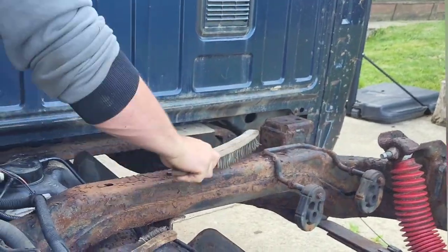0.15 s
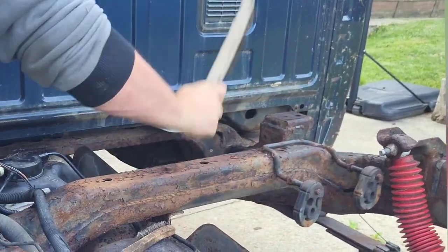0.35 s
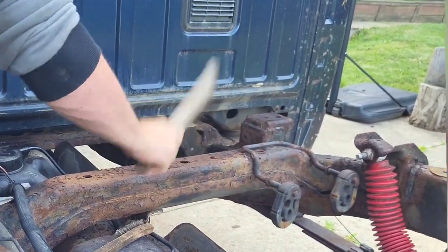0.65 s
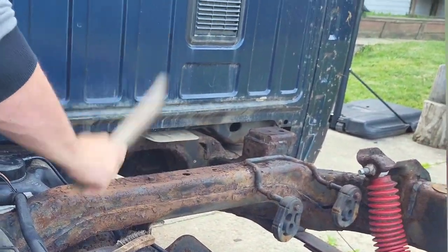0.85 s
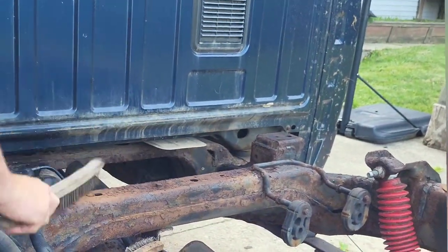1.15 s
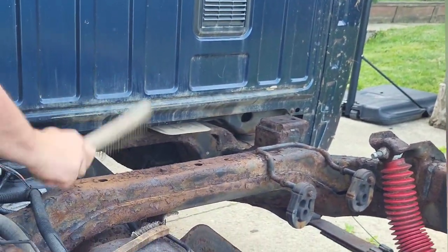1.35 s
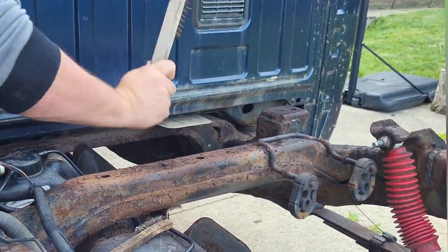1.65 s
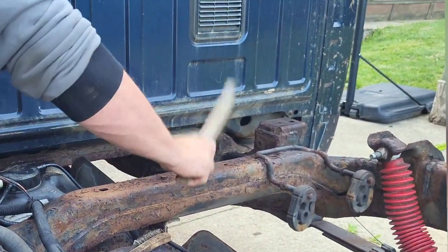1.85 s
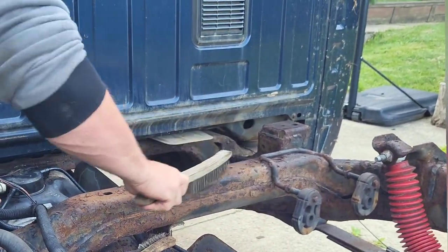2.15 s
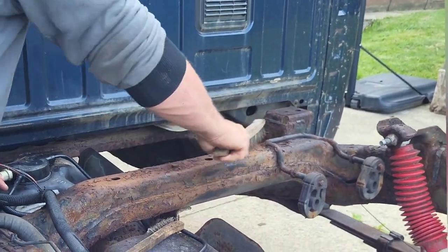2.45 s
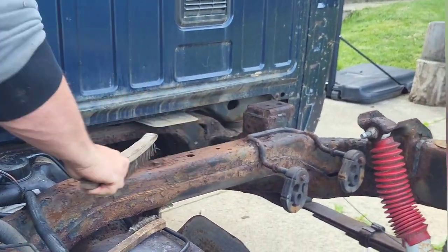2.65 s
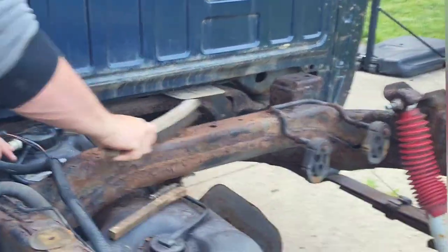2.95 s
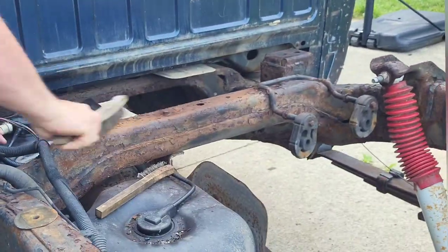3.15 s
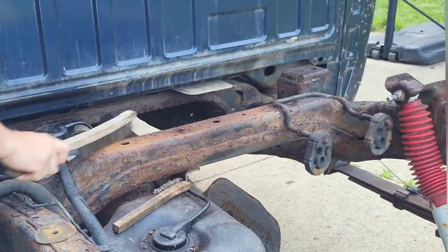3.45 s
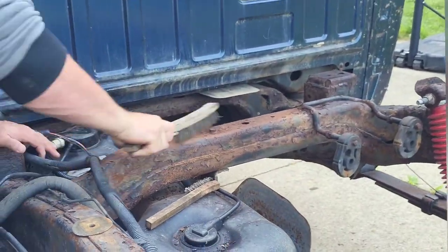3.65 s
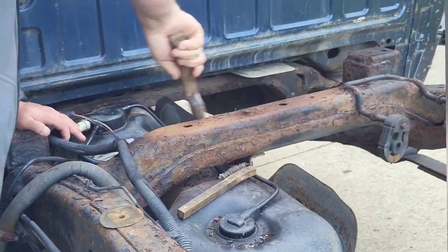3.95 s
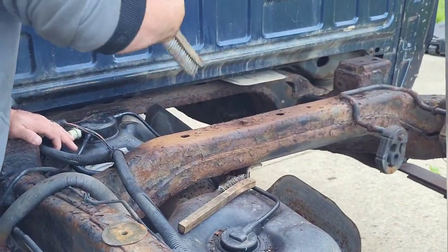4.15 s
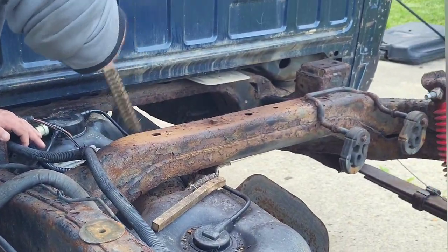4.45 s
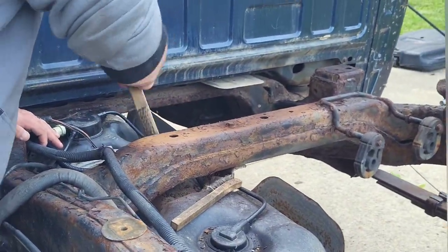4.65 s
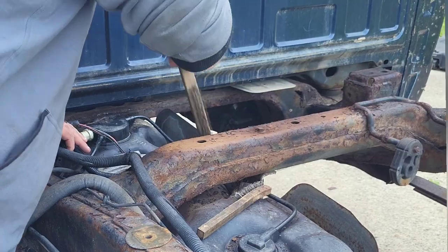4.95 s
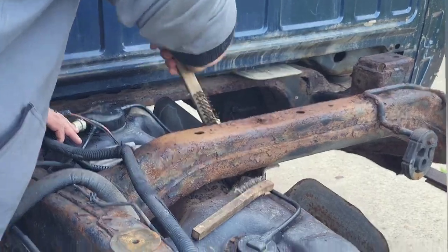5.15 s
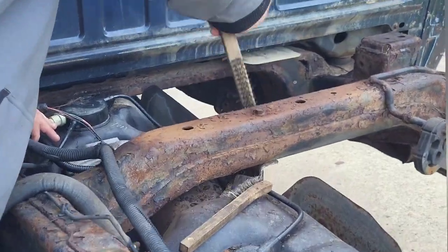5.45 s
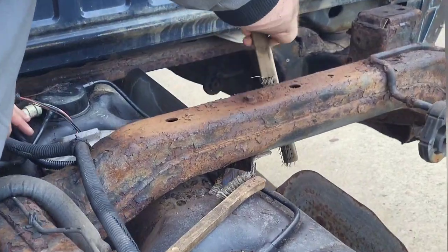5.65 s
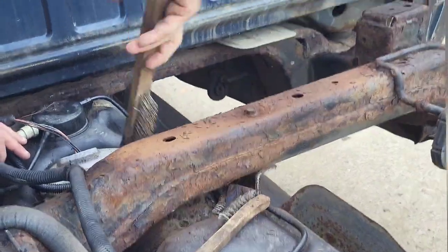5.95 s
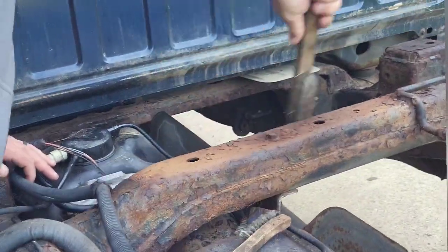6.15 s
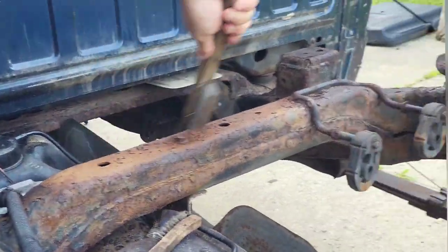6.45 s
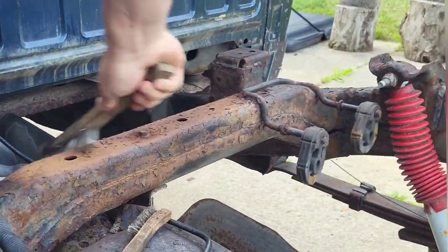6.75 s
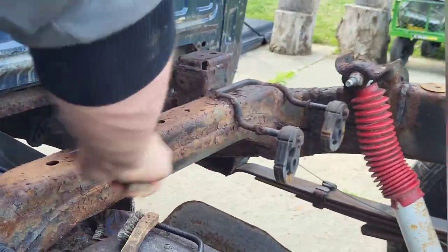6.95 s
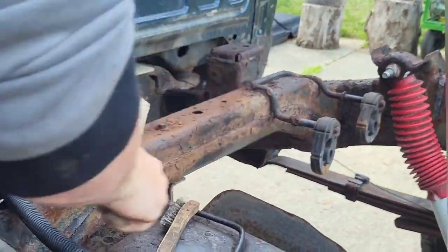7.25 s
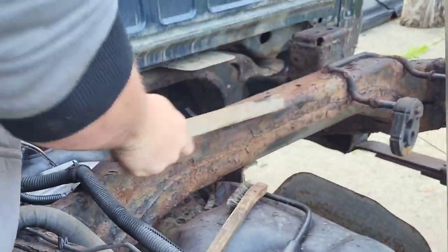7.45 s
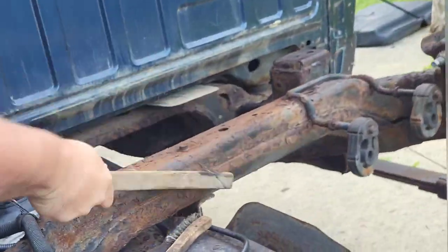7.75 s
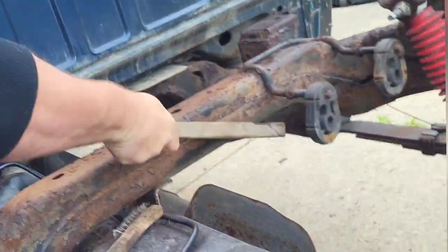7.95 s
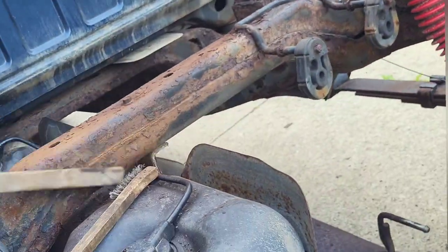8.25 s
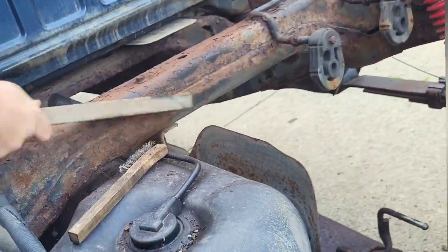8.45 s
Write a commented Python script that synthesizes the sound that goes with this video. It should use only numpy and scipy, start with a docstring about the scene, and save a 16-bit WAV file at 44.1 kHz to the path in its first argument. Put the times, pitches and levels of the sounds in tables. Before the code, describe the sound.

Close outdoors, a wire brush makes a few quick, bright scrubs on a heavy steel frame, then its wooden back bangs the metal rapidly for over a second and a half. Softer scrubbing resumes and grows steady, thins out, pauses briefly with light knocks, then scrapes unevenly before returning loud and brisk to the end. Low wind lumps bump the stereo microphones.

```python
"""A hand wire brush scrubs a rusty steel frame outdoors in quick back-and-forth strokes.
Dense bristle clicks swell with each stroke, and faint drags trail some; they fizz and ring the steel.
The wooden back of the brush bangs on the frame in a fast series and bumps it again later, among faint
rustles and small ticks: noise bursts ring the same steel, heavy bumps add low thuds, all but thuds echo.
Low, lumpy noise is wind on the microphones, mostly the left one; a faint hiss is the far hush."""
import sys
import numpy as np
from scipy import signal
from scipy.fft import rfft, irfft, next_fast_len
from scipy.io import wavfile
from scipy.ndimage import uniform_filter1d

SR = 44100
rng = np.random.default_rng(int(sys.argv[2]) if len(sys.argv) > 2 else 0)


def store_wav(level_fs):
    """Save 16-bit WAV to argv[1]."""
    pcm = np.round(np.clip(np.atleast_2d(level_fs), -1, 1) * 32767)
    wavfile.write(sys.argv[1], SR, pcm.T.astype(np.int16))


N = 379701


def gain_of(db):
    """Turns decibels into a factor for the sound pressure."""
    return 10 ** (np.asarray(db) / 20)


def evened(x):
    """Scales to a mean power of one."""
    return x / np.sqrt(np.mean(abs(x) ** 2) + 1e-20)


def read(points, hz):
    """Reads a curve between its points on a log-frequency axis."""
    f, value = np.transpose(points)
    return np.interp(np.log(hz + 1), np.log(f + 1), value)


def hump(hz, centre_hz, octaves):
    """A bell on a log-frequency axis."""
    return np.exp(-.5 * (np.log2((hz + 1) / centre_hz) / octaves) ** 2)


def coloured(x, response):
    """Filters by a function of frequency, scaled to keep the power of white noise."""
    size = next_fast_len(x.shape[-1] + 8192)
    shape = evened(response(np.fft.rfftfreq(size, 1 / SR)))
    return irfft(rfft(x, size) * shape, size)[..., :x.shape[-1]]


def flutter(seconds, size=N):
    """Unit noise smoothed twice over a span, for slow random changes."""
    span = max(round(seconds * SR), 1)
    once = uniform_filter1d(rng.standard_normal(size), span)
    return evened(uniform_filter1d(once, span))


# How alike the two microphones hear: f/Hz, likeness (1 = the same, 0 = unrelated)
LIKENESS = [(60, 1), (180, 1), (380, 1), (600, 0.66), (1650, 0.18), (4970, 0.0089), (15000, 0.0)]


def paired(x):
    """Two microphones share the bass and differ in the treble."""
    size = next_fast_len(N)
    same = np.clip(read(LIKENESS, np.fft.rfftfreq(size, 1 / SR)), 0, 1)
    left, other = rfft(x, size)
    right = same * left + np.sqrt(1 - same ** 2) * other
    return irfft(np.array([left, right]), size)[:, :N]


DIRECT_DB = -5  # sound that skips the modes, on the scale of the mode levels

# Ringing modes of the steel frame: f/Hz, width/Hz, relative level/dB
FRAME_MODES = [(169, 53, 1.5), (246, 21, 7.5), (300.6, 61, 9), (367.7, 7.6, -0.5), (500, 18.4, -1.5),
               (606, 36, -7), (697, 22, -3.5), (800, 235, 1), (1140, 47, 6.5), (1240, 52, 7.5),
               (1400, 64, -3), (1575, 40, 5.5), (2055, 490, -1), (2302, 48, -0.5), (2540, 34, -2.5),
               (2838, 52, -5), (2796, 120, -14), (3060, 43, -9), (3248, 54, -7), (3470, 75, -10.5),
               (3800, 32, -4.5), (4130, 760, -15.5), (4780, 71, -8)]


def steel(hz, place_db):
    """The frame's modes as resonances over a flat path; the place of contact favours some modes."""
    response = gain_of(DIRECT_DB)
    for (f, width, db), extra_db in zip(FRAME_MODES, place_db):
        response = response + gain_of(db + extra_db) / (1 + 2j * (hz - f) / width)
    return response


PLACE_DB = 3  # spread of mode levels from place to place; blows use half of it


def along_frame(body, stroke, count=5):
    """Each stroke or drag lands on one of a few places, and each place favours other modes."""
    place = rng.integers(0, count, stroke.max() + 1)[stroke]
    out = np.zeros_like(body)
    for k in range(count):
        place_db = PLACE_DB * rng.standard_normal(len(FRAME_MODES))
        here = uniform_filter1d((place == k) * 1., 300)  # smooth change from place to place
        out += coloured(body * here, lambda f: steel(f, place_db))
    return out


LIFT_DB, LAND_DB = -110, -49  # relative fizz at lifting and landing
PEAKED, EARLY = 0.92, .89  # shape and lean of each swell
HALT_DB, HALT_S = -8, 0.01  # depth and half length of a dead stop
GRAIN_DB, PATCH_DB = 1.5, 2.0  # spread of click sizes and of patches of colour
TUFT_DB = 1.3  # spread of each of two flutters, as tufts catch
STEADY, USUAL_DB = 0.19, -32  # steel loses 0.19 dB against the fizz per dB of fizz over usual
PULL_OCTAVES_PER_DB = -.05  # rows that ring the steel more also ring it lower
WANDER_OCTAVES, REGION_OCTAVES = .1, .22  # stray from row to row, and width, of the loudest region

# Strokes and the faint drags that trail some swipes: t/s at the start,
# relative fizz level/dB at its crest
STROKE_TIMES = [(0.0, -23), (0.066, -24), (0.121, -22.5), (0.187, -26.5), (0.248, -27), (0.325, -58),
                (1.998, -37), (2.18, -35), (2.234, -41), (2.301, -32.5), (2.357, -36), (2.417, -30.5),
                (2.481, -34), (2.535, -28.5), (2.6, -30.5), (2.671, -34), (2.718, -34), (2.788, -29.5),
                (2.851, -29.5), (2.907, -28), (2.973, -32.5), (3.026, -28), (3.088, -29), (3.162, -28),
                (3.205, -30.5), (3.28, -35), (3.345, -30), (3.464, -27.5), (3.505, -29.5), (3.628, -29.5),
                (3.695, -28), (3.747, -27.5), (3.816, -28), (3.889, -35), (3.964, -41), (4.02, -50.5),
                (4.085, -66), (4.329, -47.5), (4.386, -33.5), (4.44, -37), (4.48, -27.5), (4.536, -39.5),
                (4.567, -39), (4.603, -42), (4.646, -35), (4.7, -41.5), (4.852, -41), (4.885, -37.5),
                (4.932, -43.5), (4.964, -37), (5.011, -35), (5.085, -37.5), (5.128, -33.5), (5.187, -36),
                (5.252, -40.5), (5.292, -30.5), (5.346, -44.5), (5.39, -32), (5.445, -45.5), (5.48, -30.5),
                (5.538, -50), (5.564, -33), (5.62, -46.5), (5.705, -38.5), (5.784, -39.5), (5.861, -56),
                (5.93, -62.5), (6.089, -23.5), (6.168, -26), (6.226, -25), (6.277, -24.5), (6.333, -23),
                (6.389, -26), (6.438, -26.5), (6.493, -29), (6.549, -27.5), (6.605, -27.5), (6.657, -29.5),
                (6.712, -29.5), (6.766, -27.5), (6.825, -28), (6.89, -27), (6.955, -30.5), (7.011, -25),
                (7.068, -30.5), (7.136, -28.5), (7.21, -30.5), (7.276, -29.5), (7.361, -34), (7.452, -30),
                (7.619, -23), (7.718, -23.5), (7.779, -23.5), (7.853, -26), (7.918, -26.5), (7.983, -22.5),
                (8.109, -25.5), (8.175, -21), (8.23, -22), (8.29, -19.5), (8.356, -27), (8.404, -24.5),
                (8.463, -25), (8.521, -24.5), (8.576, -24)]
# The brush leaves the steel until the next stroke: t/s
LIFT_TIMES = [0.372, 4.16, 7.576, 8.64]
# Turns where the hand stops dead and the fizz drops briefly: t/s
HALT_TIMES = [0.121, 2.18, 2.301, 2.417, 2.788, 3.161, 3.28, 3.345, 3.504, 3.628, 4.387, 4.44, 4.7, 5.128,
              5.292, 5.644, 6.226, 6.388, 6.549, 6.712, 6.825, 7.136, 7.361, 7.452, 7.779, 8.109, 8.176,
              8.29, 8.521]
# How the brush is held: t/s, bristle ring relative level/dB, low scrape relative level/dB,
# left over right level/dB, dip between swells level/dB, steel over fizz relative level/dB,
# extra steel on every other row and less on the rest level/dB,
# steel's loudest region f/Hz before it shifts
GRIP_CHANGES = [(0, 1, -4.5, 1, 8.5, 1.5, 0, 3570), (2, 8, 0, 2, 4.5, 4, -1.5, 3260),
                (2.998, 3.5, 0, 1.5, 8, 3, -1.4, 3510), (4, 1, -1.5, 3.5, 6.5, 1, -0.3, 3250),
                (4.3, 0, 17, 3, 10.5, -7.5, -0.8, 2480), (5.2, -4, 10.5, 1.5, 13, -0.5, 0.8, 3130),
                (5.9, 0.5, 10, 0.5, 11, -5.5, -0.5, 3380), (6.2, -2, 2.5, 1.5, 11.5, -2, 6, 3500),
                (6.6, -0.5, 8, 1.5, 4.5, -7, 4, 3130), (6.8, 12.5, 4.5, -1, 11, -0.8, 4, 3070),
                (7.2, 9.5, 4.5, -4.5, 8, 0.8, 6, 2860), (7.6, 5, 2, 3, 6.5, -3.5, 1.2, 2920),
                (8, -1, -0.5, 3, 6.5, -2, -0.1, 3330), (8.61, -2.5, 9.5, 1.5, 7, -8, 0.8, 2870)]
# Colour of bristle tips flicking over rust: f/Hz, relative level/dB (per Hz)
FIZZ_COLOUR = [(2060, -28.5), (3500, -29), (4220, -3.5), (5650, -7.5), (7390, -1), (9240, -10),
               (11000, -11.5), (13300, -3.5), (15500, -4.5)]


def brush():
    """Dense bristle clicks swell in each stroke or drag and ring the steel under them."""
    events = list(STROKE_TIMES) + [(s, -np.inf) for s in LIFT_TIMES]
    start, crest_db = np.transpose(sorted(events))
    s, ring_db, scrape_db, pan_db, dip_db, steel_db, pull_db, region_hz = np.transpose(GRIP_CHANGES)
    off = np.isinf(crest_db)

    # loudness where one swell meets the next
    edge_db = (crest_db + np.roll(crest_db, 1)) / 2 - np.interp(start, s, dip_db)
    edge_db[np.roll(off, 1)], edge_db[off] = LAND_DB, LIFT_DB
    edge_db[0] = crest_db[0] - dip_db[0]
    crest_db[off] = USUAL_DB  # only a stand-in, muted below

    # rise and fall of each swell
    t = np.arange(N) / SR
    k = np.clip(np.searchsorted(start, t, "right") - 1, 0, len(start) - 2)
    progress = np.clip((t - start[k]) / (start[k + 1] - start[k]), 0, 1) ** EARLY
    rest_db = edge_db[k] + progress * (edge_db[k + 1] - edge_db[k])
    swell = abs(np.sin(np.pi * progress)) ** PEAKED
    level_db = rest_db + swell * (crest_db[k] - rest_db)
    level_db += HALT_DB * sum(np.exp(-((t - halt) / HALT_S) ** 2) for halt in HALT_TIMES)

    # some tips snap harder, and rust flakes catch whole tufts
    clicks = rng.standard_normal((2, N)) * gain_of(GRAIN_DB * rng.exponential(1, N))
    clumps_db = TUFT_DB * (flutter(0.011) + flutter(0.0085))
    rubbing = evened(clicks) * gain_of(level_db + clumps_db) * ~off[k]
    hz, frames, z = signal.stft(rubbing, SR, nperseg=256, noverlap=192)
    hz = hz[:, None]

    # every other row rings the steel differently
    middle = start + np.append(np.diff(start), 0) / 2
    pull_db = np.interp(middle, s, pull_db) * (-1) ** np.arange(len(start))
    steel_db = np.interp(middle, s, steel_db) + pull_db - STEADY * (crest_db - USUAL_DB)
    shift = PULL_OCTAVES_PER_DB * pull_db + WANDER_OCTAVES * rng.standard_normal(len(start))
    region_hz = np.interp(middle, s, region_hz) * 2 ** shift
    ring_db, scrape_db, pan_db = (np.interp(frames, s, c) for c in (ring_db, scrape_db, pan_db))

    # random patches of colour across pitch and time
    patch_noise = uniform_filter1d(rng.standard_normal(z.shape[1:]), 2, 0)
    patches = gain_of(PATCH_DB * evened(uniform_filter1d(patch_noise, 14, 1)))

    fizz_gain = gain_of(read(FIZZ_COLOUR, hz) + 3.5 + ring_db * hump(hz, 7600, 0.2))
    region = hump(hz, np.interp(frames, middle, region_hz), REGION_OCTAVES)
    scrape = gain_of(scrape_db - 18.0) * hump(hz, 1330, 2.7)
    body_gain = region + .5 * hump(hz, 3100, 0.69) + scrape
    side = gain_of(np.array([pan_db, -pan_db]) / 2)[:, None]
    body_gain = body_gain * gain_of(np.interp(frames, middle, steel_db) + 5.0) * side
    fizz, body = (signal.istft(z * patches * g, SR, nperseg=256, noverlap=192)[1][:, :N]
                  for g in (fizz_gain, body_gain))
    return paired(fizz + along_frame(body, k))


CALM_DB = -47  # relative level of the breeze between gusts
SHARED_WIND = .5  # likeness of the buffeting at the two microphones
GUST_DB = 2.0  # lumpiness

# Gusts over the breeze: t/s at the top, relative level/dB, half length/s
GUST_TIMES = [(0.1, -47.5, 1), (0.798, -67, 0.27), (2.142, -35, 0.076), (2.333, -31, 0.025),
              (2.74, -40.5, 0.1), (3.573, -33, 0.093), (3.8, -36, 0.077), (4.42, -51, 0.2),
              (5.27, -47, 0.088), (6.248, -43, 0.047), (8.35, -35, 0.033)]
# Colour of the buffeting: f/Hz, relative level/dB (per Hz)
BUFFET_COLOUR = [(8.8, -39.5), (15, -20), (41, -4), (60, 4.5), (126, -5.5), (295, -27), (336, -22),
                 (500, -53), (650, -66), (1100, -120)]


def wind():
    """Lumpy low pressure at the microphones, partly shared, stronger on the left."""
    t = np.arange(N) / SR
    left, other = coloured(rng.standard_normal((2, N)), lambda f: gain_of(read(BUFFET_COLOUR, f)))
    right = SHARED_WIND * left + np.sqrt(1 - SHARED_WIND ** 2) * other
    level = gain_of(CALM_DB)
    for s, db, half in GUST_TIMES:
        level = level + gain_of(db) * np.exp(-((t - s) / half) ** 2)
    lumps = level * gain_of(GUST_DB * flutter(0.01))
    return np.array([left, right]) * gain_of([[2.8], [-2.8]]) * lumps


# Colour of the distant outdoor hush: f/Hz, relative level/dB (per Hz)
HUSH_COLOUR = [(88, -48), (150, -5), (396, -16.5), (1020, -12.5), (1200, -17.5), (2360, -14.5),
               (10000, -30.5), (14000, -39), (15500, -30)]


def air():
    """A steady far hush, made of filtered noise."""
    hush = coloured(rng.standard_normal((2, N)), lambda f: gain_of(read(HUSH_COLOUR, f)))
    return gain_of(-54.5) * paired(hush)


def surroundings(x):
    """Sparse echoes off the truck cab and the concrete, short and dull as treble dies sooner."""
    taps = np.zeros((2, 13000))
    at = np.arange(200, 12980, 20) + rng.integers(0, 20, (2, 639))
    np.put_along_axis(taps, at, rng.choice([-1., 1.], at.shape), 1)
    hz, t, z = signal.stft(taps, SR, nperseg=256)
    t60 = read([(300, 0.16), (2000, 0.089), (12000, 0.049)], hz)[:, None]  # f/Hz, time to fall 60 dB/s
    tail = signal.istft(z * gain_of(-60 * t / t60), SR, nperseg=256)[1]
    return signal.fftconvolve(x, tail / np.linalg.norm(tail[0]), axes=1)[:, :N]


def contact(t, rise, hold, t60):
    """Force of a contact: it builds to a spike, holds while the parts touch, then dies by 60 dB in t60."""
    spike = 1 + 0.00024 / (rise + 0.009) * np.exp(-abs(t - rise) / 0.0003)  # sharper for a quick rise
    build = np.clip(t / rise, 0, 1) ** 0.85
    return spike * build * gain_of(-60 * np.maximum(t - rise - hold, 0) / t60)


BOOM_HZ, RING_OCTAVES = 378, .15  # centre of the boom; width of the ring's loudest region
ACCENT_DB, ACCENT_OCTAVES = 4, .04  # modes nearest that region move towards this level
KNOCK_LEFT_DB, LEFT_DB_PER_DOUBLED_RISE = 3.5, -0.55  # quick rises land further left
SHIVER_DB, RATTLE_DB = -33, 5  # shaken bristles under the rest, and their unevenness

# Blows of the brush's back, faint bristle rustles and small metal ticks: t/s, relative level/dB,
# rise/s (at least 0.0005 is played), contact/s (ring and crack take a part of it),
# low boom relative level/dB, crack relative level/dB, loudest region of the ring f/Hz
CONTACTS = [(0.386, -15.5, 0.0014, 0.021, -4.5, 0, 2480), (0.435, -50, 0.0044, 0.03, -8, 14, 4190),
            (0.485, -16, 0.001, 0.015, -4.5, 3.5, 3720), (0.587, -18, 0.014, 0.0029, -1, -4.5, 1240),
            (0.676, -23, 0.013, 0.012, -0.7, -13.5, 1230), (0.775, -26.5, 0.0038, 0.0049, 0, -11, 3460),
            (0.791, -40.5, 0.0046, 0.01, -1, 6, 3500), (0.88, -14.5, 0.00069, 0.012, -7, -6.5, 3470),
            (0.981, -17, 0.00035, 0.0062, -10, 0.5, 3470), (1.018, -55, 0.001, 0.015, 8, 10, 2640),
            (1.067, -14, 0.0016, 0.012, -7, 0.5, 2320), (1.154, -15, 0.0014, 0.019, -6.5, -10, 2240),
            (1.242, -26, 0.0043, 0.014, -4.5, 9, 3950), (1.334, -17.5, 0.0022, 0.014, -3.5, -1.5, 2410),
            (1.361, -45, 0.0014, 0.0027, -8, 13.5, 2500), (1.422, -22.5, 0.016, 0.00096, 2, -14, 3160),
            (1.441, -21, 0.0016, 0.0023, -19, -1, 3400), (1.513, -17, 0.019, 0.0036, -0.5, -13.5, 1980),
            (1.563, -46, 0.002, 0.004, -3, 6, 3000), (1.609, -29, 0.012, 0.0053, 3.5, -11, 800),
            (1.635, -36.5, 0.00088, 0.0036, -10, 3, 3800), (1.685, -50, 0.001, 0.003, -16, 10, 4780),
            (1.698, -24, 0.013, 0.012, 2.5, -28, 1200), (1.793, -12.5, 0.00047, 0.0045, -7, 1.5, 2500),
            (1.871, -12.5, 0.0022, 0.017, -7.5, -12, 2540), (1.955, -13, 0.022, 0.0017, -3, -18, 1240),
            (1.984, -29, 0.001, 0.0026, -8, 2.5, 2540), (4.231, -29, 0.0087, 0.0065, -5.5, -19, 1140),
            (4.315, -31.5, 0.0022, 0.0035, -6, -2, 3100), (4.583, -30.5, 0.0057, 0.017, 7.5, -20, 1560),
            (5.223, -25, 0.0075, 0.014, -6.5, -2.5, 1330), (5.818, -41, 0.00092, 0.0075, -30, -10, 2450),
            (5.838, -37, 0.00068, 0.0032, -29, -8, 2200), (5.873, -27, 0.00081, 0.0019, -25, -5, 5170),
            (5.973, -50, 0.0083, 0.019, -6, -12, 1270), (6.18, -25, 0.016, 0.0069, 1.5, -24, 910),
            (6.84, -24.5, 0.003, 0.013, -15, -8, 2350), (7.533, -31, 0.00095, 0.0011, -12, -18, 800),
            (7.603, -27.5, 0.0039, 0.0079, -7.5, 6, 3370), (8.318, -24.5, 0.013, 0.0092, 2, -23, 500)]
# Colour of the crack before its tilt: f/Hz, relative level/dB (per Hz)
CRACK_COLOUR = [(2350, -15.5), (4000, -3.5), (4280, -10.5), (5430, -7.5), (6590, -5.5), (9000, -22),
                (15500, -25.5)]


def knocks():
    """Blows, rustles and ticks: chattering force booms, rings the frame, cracks and shakes bristles."""
    out, t = np.zeros((2, N + SR)), np.arange(8192) / SR
    mode_hz, _, mode_db = np.transpose(FRAME_MODES)
    for s, db, rise, hold, boom_db, crack_db, ring_hz in CONTACTS:
        rise, hold = max(rise, .0005), max(hold, 0)
        place_db = PLACE_DB / 2 * rng.standard_normal(len(FRAME_MODES))
        place_db += (ACCENT_DB - mode_db) * hump(mode_hz, ring_hz, ACCENT_OCTAVES)
        chatter = rng.standard_normal((4, 2, len(t))) * gain_of(2.9 * flutter(0.0056, size=len(t)))

        def boom_response(f):
            return steel(f, place_db) * (hump(f, BOOM_HZ, 0.64) + 0.49 * hump(f, 450, 1.0))

        def ring_response(f):
            broad = 0.81 * hump(f, np.sqrt(2100 * ring_hz), 0.98)
            return steel(f, place_db) * (hump(f, ring_hz, RING_OCTAVES) + broad)

        def crack_response(f):  # a weaker crack is also duller
            return gain_of(read(CRACK_COLOUR, f) + 0.21 * crack_db * np.log2(f / 5000 + 1))

        # the boom comes late
        boom = coloured(chatter[0] * contact(t, rise + 0.0039, hold, 0.049), boom_response)
        ring = coloured(chatter[1] * contact(t, rise, hold * 0.74, 0.024), ring_response)
        crack = coloured(chatter[2] * contact(t, rise, hold * 0.043, 0.025), crack_response)
        rattle = gain_of(RATTLE_DB * flutter(0.0038, size=len(t)))
        shiver = coloured(chatter[3] * rattle * contact(t, rise, hold, 0.16),
                          lambda f: gain_of(read(FIZZ_COLOUR, f)))

        pan_db = KNOCK_LEFT_DB + LEFT_DB_PER_DOUBLED_RISE * np.log2(rise / 0.0017)
        side = gain_of([[pan_db / 2], [-pan_db / 2]])
        touch = gain_of(boom_db) * boom + gain_of(SHIVER_DB) * shiver
        touch = touch + side * (ring + gain_of(crack_db) * crack)
        out[:, round(s * SR):][:, :len(t)] += gain_of(db) * touch
    return paired(out[:, :N])


THUD_OCTAVES, THUD_RISE_S, THUD_T60_S = 0.68, 0.0089, 0.24  # width, rise, time to fall 60 dB

# Heavy bumps shake the whole chassis: t/s, relative level/dB, f/Hz
HEAVY_BUMPS = [(5.222, -26.5, 149), (6.183, -20, 134), (6.849, -33, 70), (8.319, -26, 147)]


def thuds():
    """A low lump of noise that swells and dies, alike at both microphones."""
    out, t = np.zeros(N + SR), np.arange(16384) / SR
    for s, db, thud_hz in HEAVY_BUMPS:
        lump = coloured(rng.standard_normal(len(t)), lambda f: hump(f, thud_hz, THUD_OCTAVES))
        force = contact(t, THUD_RISE_S, 0, THUD_T60_S)
        out[round(s * SR):][:len(t)] += gain_of(db) * lump * force
    return out[:N]


def scene():
    """Adds up the sources, with echoes of the knocks and the scrubbing."""
    hits, scrub = knocks(), brush()
    echoes = surroundings(gain_of(-21.5) * hits + gain_of(-15.0) * scrub)
    return hits + scrub + echoes + thuds() + wind() + air()


EDGE_HZ = 15740  # upper band limit

# Colour of the two microphones: f/Hz, left over right level/dB
MICROPHONE_LEAN = [(600, 2.5), (1200, -0.5), (2500, 1.5), (5000, 3.5), (9000, -4), (15000, -5)]


def record(dry):
    """The two microphones differ above the bass; loud peaks round off; then the band limit."""
    size = next_fast_len(N)
    hz = np.fft.rfftfreq(size, 1 / SR)
    lean_db = np.array([[.5], [-.5]]) * read(MICROPHONE_LEAN, hz) * (hz > 600)
    heard = np.tanh(irfft(rfft(dry, size) * gain_of(lean_db), size)[:, :N])
    low_pass = signal.firwin(1535, EDGE_HZ, window=("kaiser", 9), fs=SR)
    return signal.oaconvolve(heard, low_pass[None], "same")


dry = scene()
out = record(dry)
store_wav(out)
```